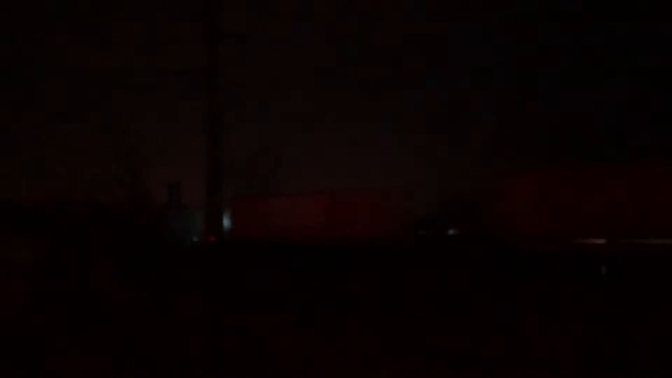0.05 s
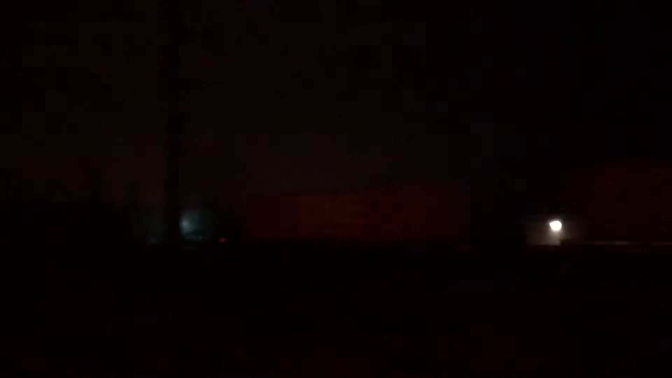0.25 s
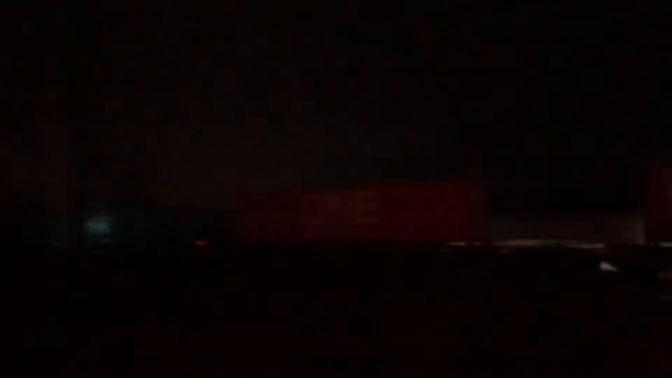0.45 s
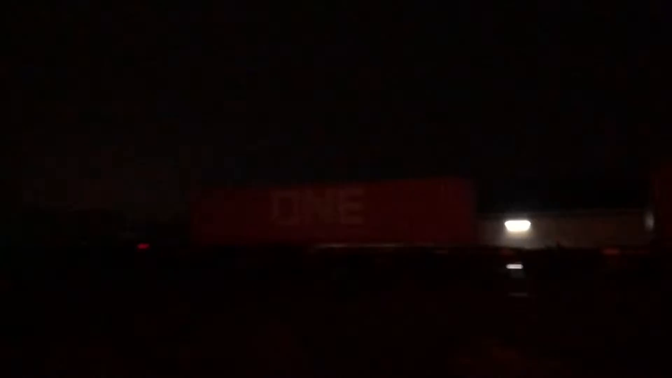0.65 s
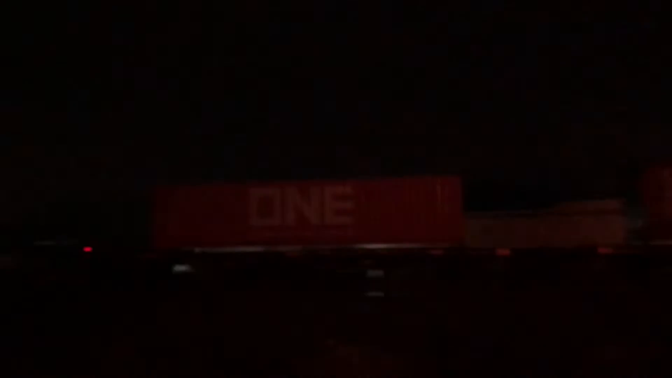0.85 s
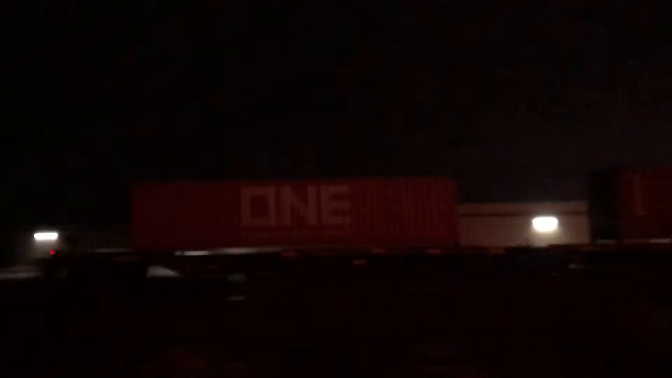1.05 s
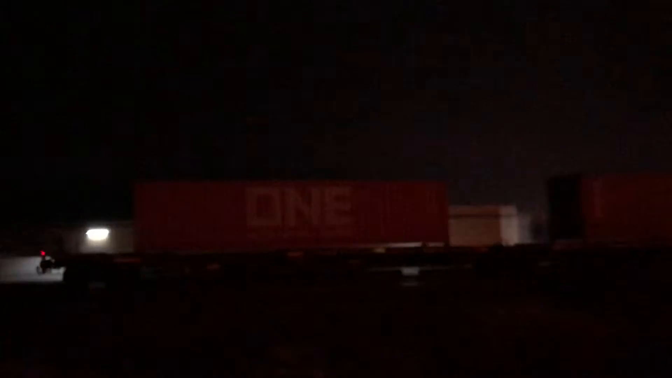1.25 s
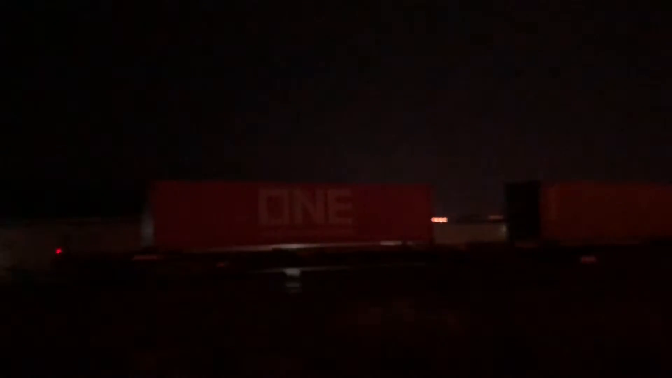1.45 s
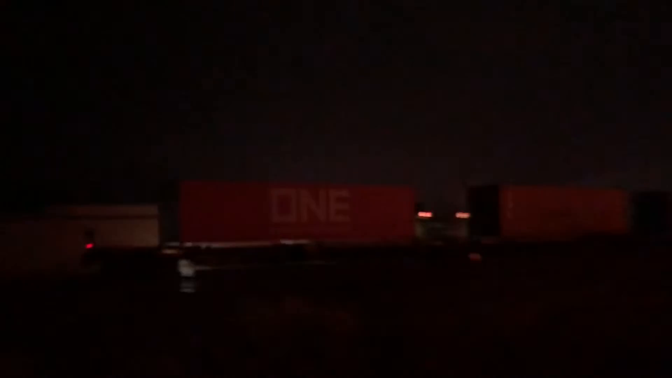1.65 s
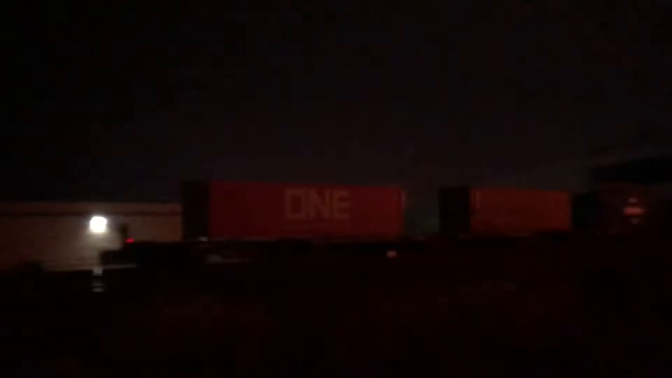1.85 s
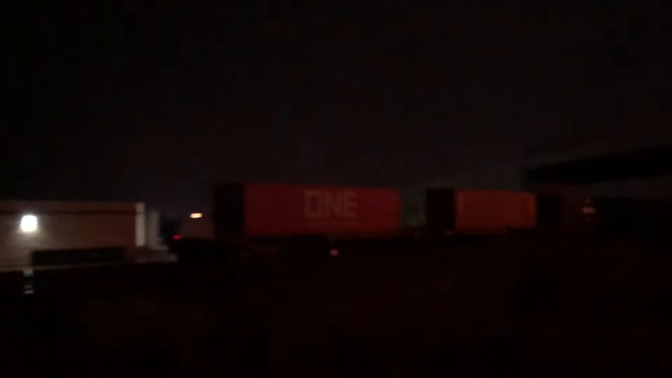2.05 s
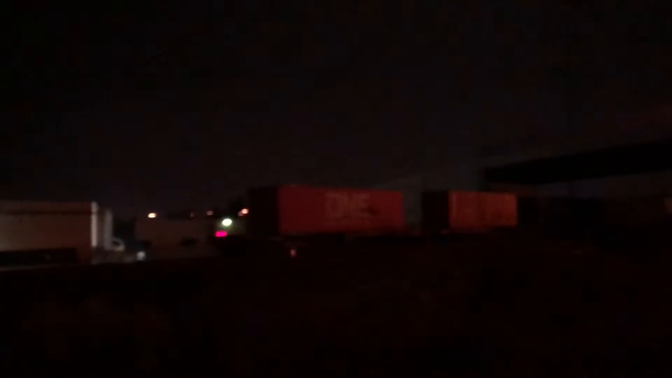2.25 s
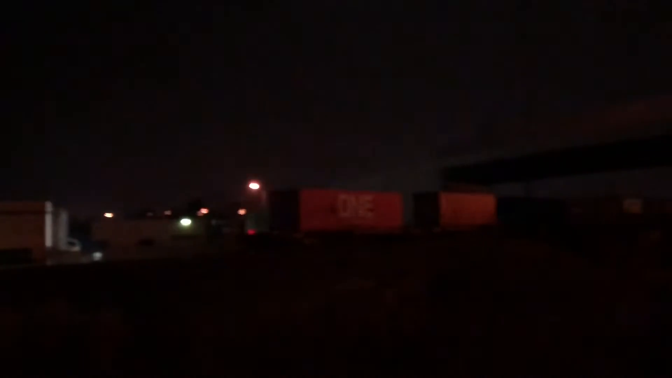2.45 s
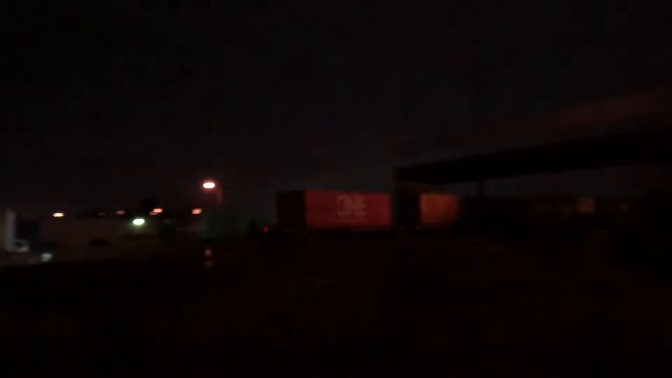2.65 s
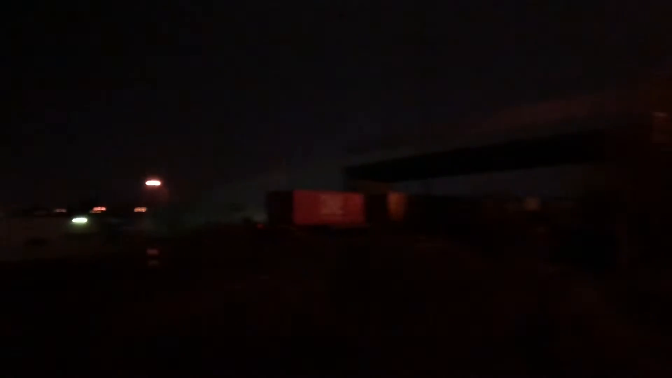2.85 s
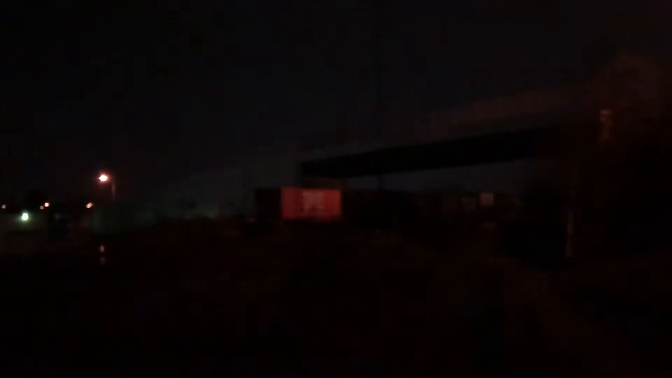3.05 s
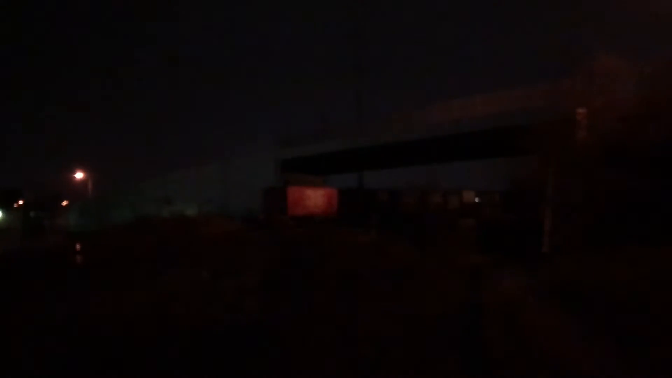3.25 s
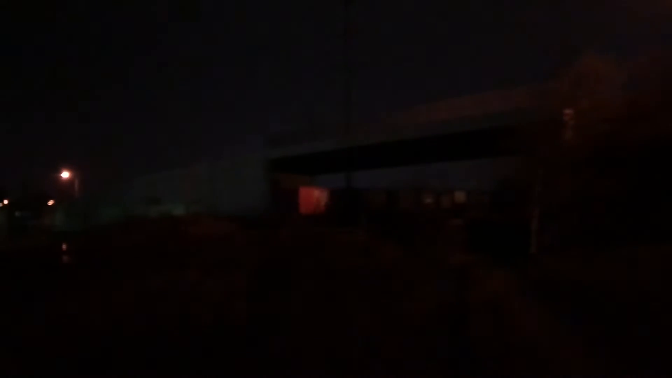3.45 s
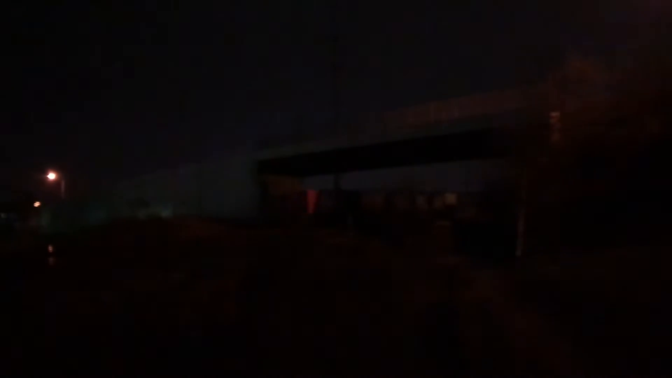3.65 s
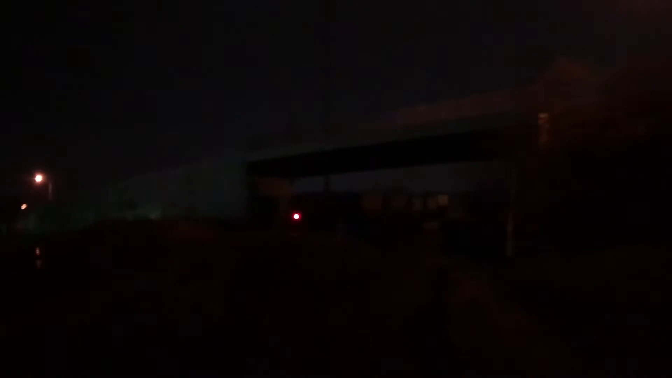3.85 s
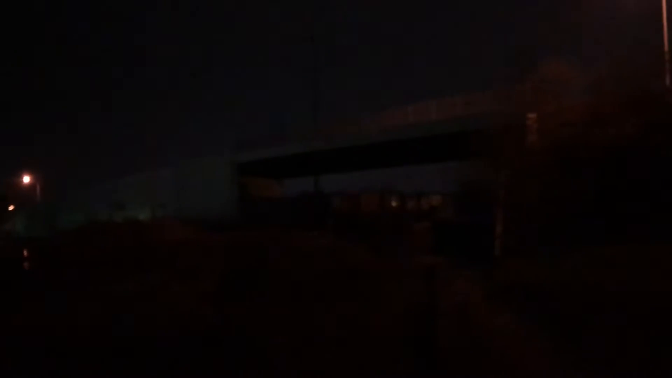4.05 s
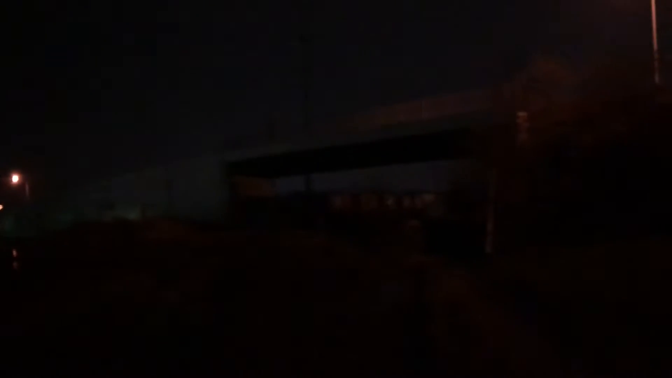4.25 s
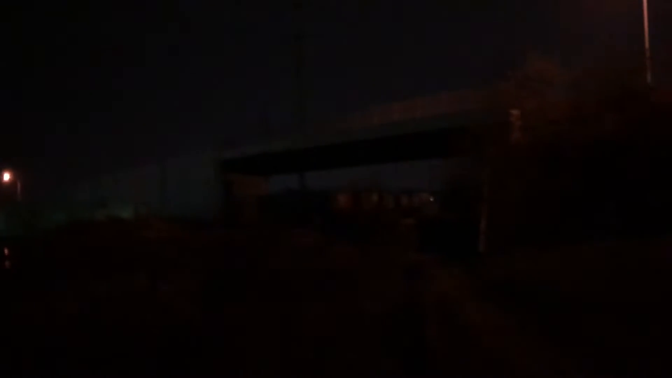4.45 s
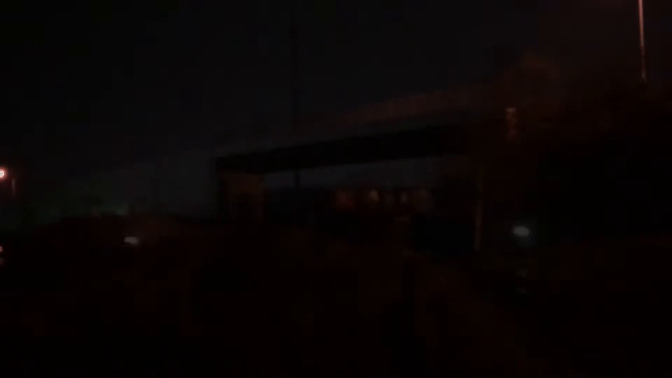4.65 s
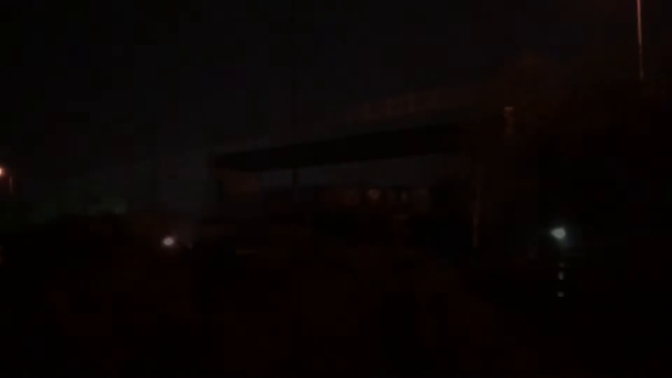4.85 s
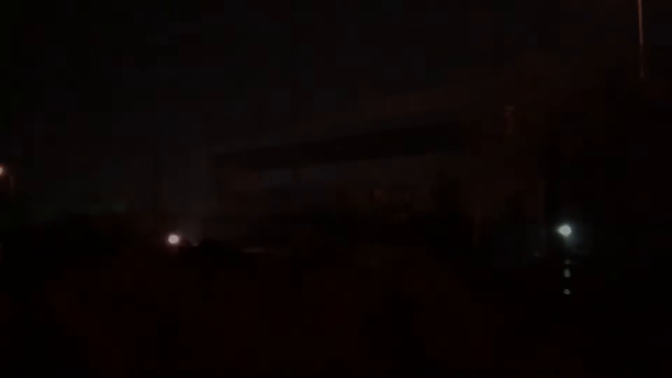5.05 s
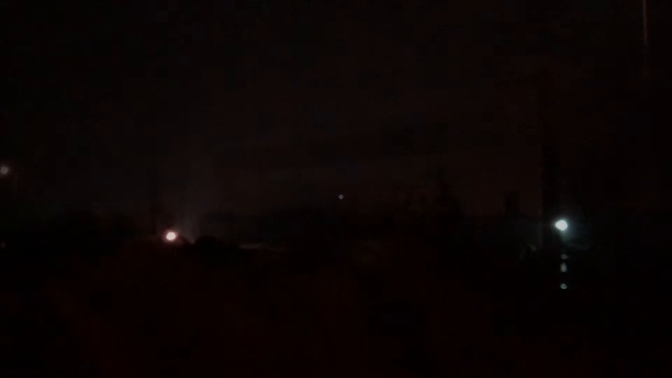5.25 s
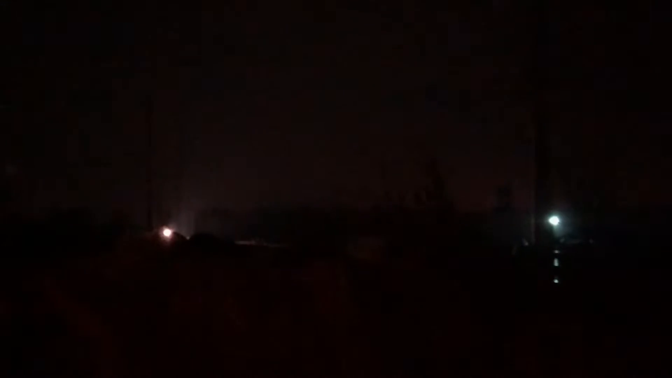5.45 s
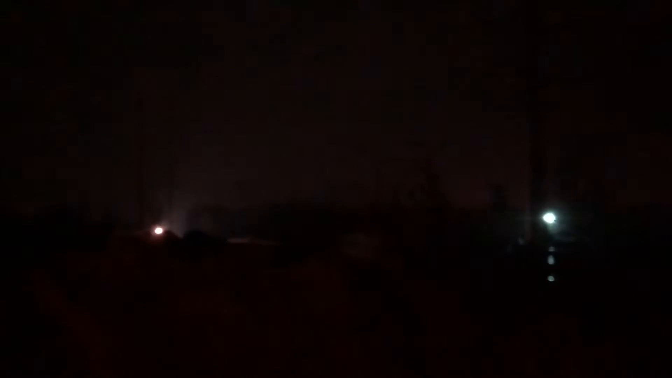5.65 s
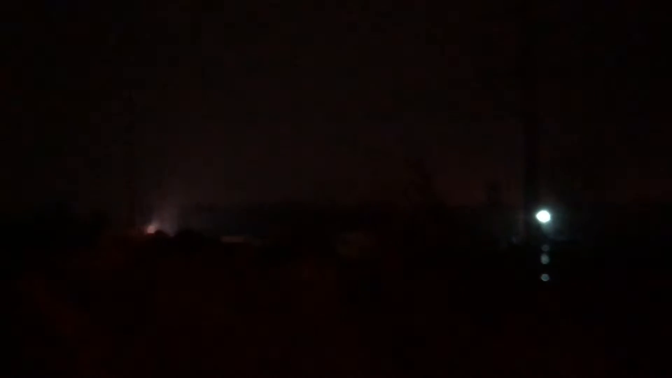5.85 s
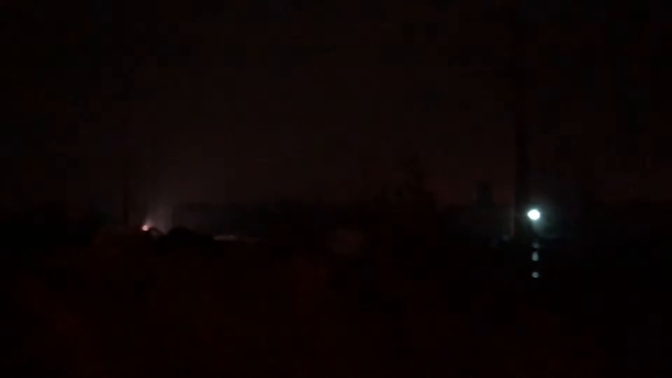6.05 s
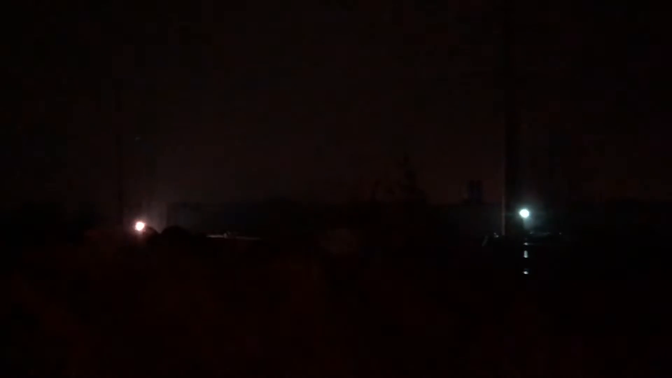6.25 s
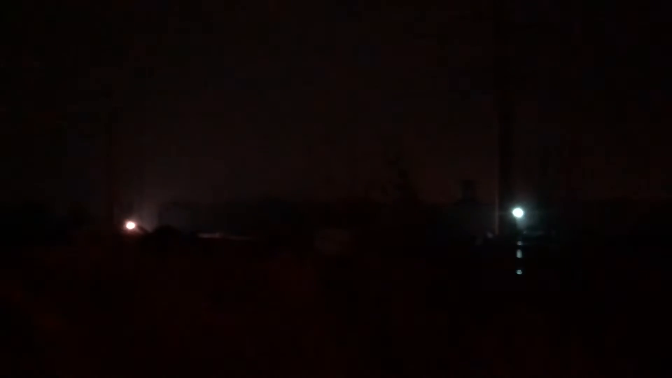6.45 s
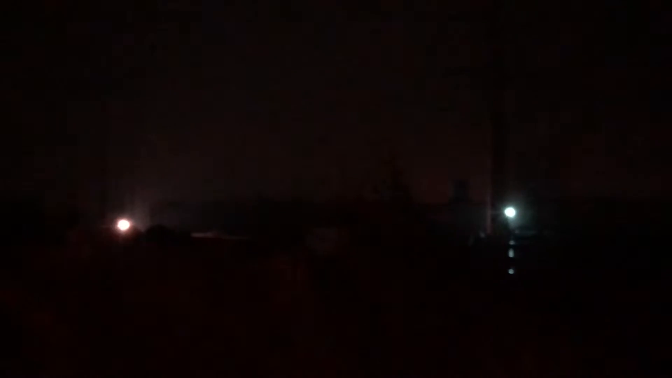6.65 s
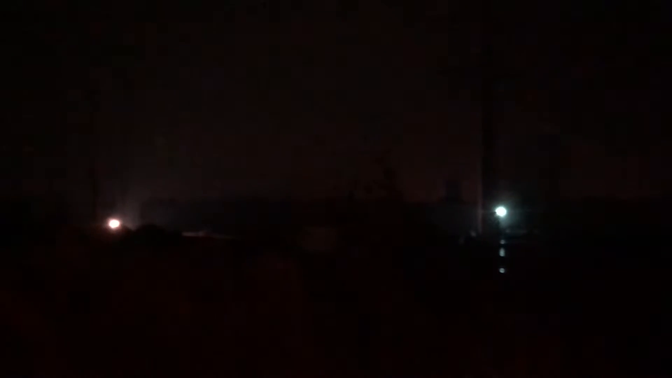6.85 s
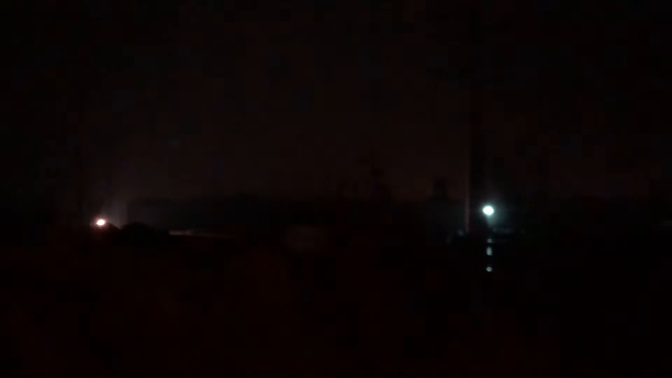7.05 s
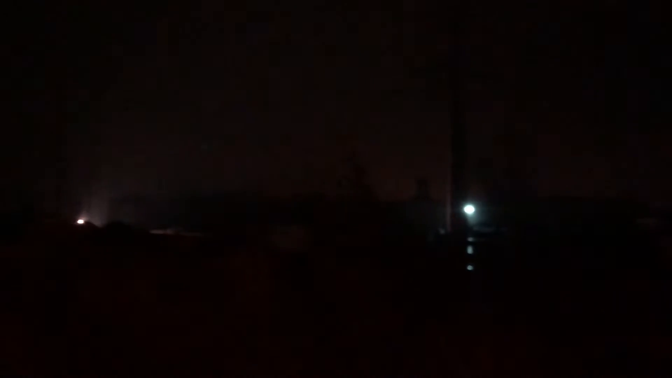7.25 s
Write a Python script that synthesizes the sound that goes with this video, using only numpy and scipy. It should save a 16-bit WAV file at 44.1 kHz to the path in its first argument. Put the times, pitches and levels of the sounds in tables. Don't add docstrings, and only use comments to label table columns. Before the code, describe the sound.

Loud steel wheel clatter and jingling rush past and recede with thin squeals, giving way to a faint, steady far-off diesel engine throb.

```python
import sys
import numpy as np
from scipy import signal
from scipy.io import wavfile
from scipy.ndimage import uniform_filter1d

SR = 44100
rng = np.random.default_rng(int(sys.argv[2]) if len(sys.argv) > 2 else 0)


def to_wav(sig):
    pcm = np.clip(np.atleast_2d(sig), -1, 1) * 32767
    pcm = np.round(pcm).astype(np.int16)
    wavfile.write(sys.argv[1], SR, pcm.T)


def volts_from_decibels(level):
    exponent = np.asarray(level, float) / 20
    return 10 ** exponent


N = 322371
TIME_S = np.arange(N) / SR

# frequency_hz, density_db (per Hz)
HISS_COLOUR = [(1530, -30), (2600, -1), (3310, -9), (4640, -8), (5040, -8.5), (13500, -17), (15100, -13.5),
               (15700, -19)]
HISS_DB = -78.5
# start_s, level_db, pitch_hz
BODY_SNAP = (5.0333, -45, 12500)
# first_s, period_s, pair_gap_s, first_db, last_db
LENS_TICKS = (7.113, .0333, .0129, -63, -50)

# multiple_of_cycle, level_db (rms)
EXHAUST_ORDERS = [(3, -71), (4, -97), (5, -72), (6, -53), (7, -70), (8, -75), (9, -53), (10, -62),
                  (11, -54.5), (12, -53), (13, -58), (14, -60), (15, -58), (16, -67.5), (17, -71),
                  (18, -82), (19, -61), (20, -71), (21, -57.5), (22, -77), (23, -72), (24, -83),
                  (25, -63.5), (26, -77.5), (27, -69), (28, -66), (29, -81), (30, -72.5), (31, -87),
                  (32, -86)]
CYCLE_HZ, FIRST_FIRING = 8.939, 0.104
# frequency_hz, density_db (per Hz)
FAR_COLOUR = [(15, -51), (25, -19), (38, -16), (92, -11), (146, -6), (157, -29), (192, -2), (383, -30),
              (471, -25), (711, -31.5), (874, -25.5), (1620, -31.5), (6000, -64), (7800, -94),
              (13200, -120)]
FAR_DB = -51
# centre_hz, width_hz, gain_db
FAR_PEAKS = [(680, 120, 3.5), (1590, 600, 0.5), (855, 8.6, 2)]
EXHAUST_DB, ROAR_DB, RUSH_DB, RUSH_DB_PER_S = 0.4, 2, 1, 3
FAR_FROM_S, FAR_FULL_S, FAR_BEND = 4.66, 5.37, 1.4
# start_s, first_hz, last_hz, width_hz, level_db (rms)
FAR_TONES = [
    (4.85, 655, 655, 50, -65),
    (4.9, 703, 703, 16, -69),
    (4.9, 476.4, 478.6, 2.4, -76),
    (4.9, 359.5, 359.7, 3.3, -79.5),
    (4.9, 297, 297, 16.4, -70.5),
    (5.95, 1640, 1660, 230, -64),
]
FAR_TONES_END_S = 7.8

SIDE_M, SPEED_M_S, ABEAM_S = 14.9, 11.12, 0.05
FADE_FROM_S, FADE_DB_PER_S = 4.807, 29.5
FADE_CLOSE_S, FADE_TO_S = 5.31, 5.5
# time_s, level_db
ROUGHNESS = [(0.0, -1), (0.12, 2), (0.24, 1), (0.38, 3), (0.49, -1), (0.72, 1.3), (0.84, 2.5), (0.95, 1),
             (1.16, 0.6), (1.26, -3.5), (1.42, 1), (1.85, 0), (2.3, 0.16), (2.95, 0.4), (3.4, 0.6),
             (3.7, -1), (4.2, 0.4), (4.75, 1.1)]
# frequency_hz, density_db (per Hz)
ROLL_COLOUR = [(15, -36.5), (25, -8.5), (44, -3), (92, 0), (293, -3), (394, -6), (607, -3), (1440, -9),
               (2160, -15.5), (2480, -19.5), (2910, -18), (3160, -18.5), (4870, -20.5), (14800, -54.5),
               (16000, -45)]
# centre_hz, width_hz, gain_db
ROLL_PEAKS = [(95.2, 36, 1), (280, 41, 0.5), (602, 250, -0.5), (1510, 60, 0), (2515, 90, 5.5),
              (3200, 150, 2.5), (4100, 100, 1.5), (2206, 190, -5.5), (406, 74, -2.5)]
# frequency_hz, abeam_db, ground_and_air_loss_db_per_m
ROLL_WAY = [(65, -28, 0.21), (200, -31.5, 0.03), (650, -30.5, 0.064), (1100, -31.5, -0.0267),
            (3600, -32, 0.06), (5910, -30, 0.2), (9000, -24, .6), (13020, -22, 0.4)]
# start_s, end_s, first_hz, last_hz, level_db (rms)
SQUEALS = [(.4, 0.62, 3470, 3460, -65), (0.52, 0.66, 2710, 2700, -38.5), (0.749, 1.5, 2700, 2550, -43.5),
           (2.2, 3.34, 3136, 3010, -55), (.93, 1.15, 4160, 4140, -43), (1.38, 2.104, 2525, 2470, -44),
           (1.45, 2.1, 3180, 3210, -49), (1.605, 1.762, 3550, 3600, -50), (1.8, 2.091, 3530, 3470, -51),
           (1.82, 2.089, 3840, 3870, -53), (1.1, 1.36, 8650, 9612, -57.5), (0.326, 0.33, 9200, 8600, -43),
           (.58, .64, 13600, 13400, -58), (2.85, 3.598, 1506, 1500, -44), (2.902, 3.5, 2440, 2450, -61),
           (4.721, 4.923, 1440, 1455, -42.5)]
# pitch_hz, width_hz
SQUEAL_WIDTHS = [(1450, 55), (2550, 80), (3300, 19), (9000, 49), (13500, 100)]
# start_s, pitch_hz, level_db, t60_s
PINGS = [(.040, 318, -11, .3), (.042, 590, -10, .16), (.677, 312, -9, .16), (.682, 520, -11, .3),
         (.752, 332, -10, .2), (.10, 125, -10, .4), (.135, 150, -9, .4), (.178, 118, -8, .3),
         (.195, 5400, -29, .15), (.209, 3535, -19, .3), (.305, 95, -15, .35), (.69, 90, -10, .5),
         (.70, 3740, -27, .1), (.765, 155, -12, .3), (.785, 100, -11, .5), (.84, 150, -12, .3),
         (.85, 690, -15, .2), (.95, 95, -16, .4), (.045, 10700, -34, .1), (.20, 810, -17, .3),
         (.77, 1340, -19, .15), (.265, 830, -19, .4), (.358, 120, -14, .2)]
# start_s, level_db (rms at the start), lowest_hz, t60_s
KNOCKS = [(0.047, -15, 200, 0.19), (0.117, -12.5, 170, 0.061), (0.147, -15, 170, 0.11),
          (0.206, -18, 160, 0.048), (.688, -12, 185, 0.08), (0.764, -11.5, 210, 0.07), (.785, -17, 400, .1),
          (.852, -6, 160, 0.043), (1.17, -30.5, 190, 0.042), (1.44, -38, 5000, .08),
          (1.505, -38, 8000, 0.065), (1.511, -17.5, 90, 0.072), (4.762, -30.5, 250, .14)]
KNOCK_SPAN = 9
# start_s, peak_db, thud_db, rattle_db (the last two relative to the peak)
AXLES = [(0.047, -0.5, -12, -12), (0.089, -18.5, -2.5, -7.5), (0.123, -2.5, -4, -10.5),
         (0.203, -4, -3.5, -13.5), (0.682, 1.5, -11.5, -14.5), (0.755, 1.5, -19.5, -17.5),
         (0.784, -19, -14.5, 2.5), (0.845, -10, -7.5, -12), (0.999, -21, -5, -10), (1.168, -13, -21, -25),
         (1.238, -13, -25, -15), (1.437, -15, -19, -10), (1.509, -22, -27, -15), (1.74, -25.5, -15, -4.5),
         (1.96, -32, -15, -3), (2.449, -22, -9, -18), (3.239, -17, -17, -19.5), (4.34, -36.5, -12, -5),
         (4.664, -31, -8, -20), (4.759, -30, -19, -10)]
# frequency_hz, density_db (per Hz)
BLOW_COLOUR = [(15, -52.5), (25, -17), (89, 1), (153, 3), (212, -6), (326, -11.5), (427, -14.5), (516, -12),
               (659, -8.5), (988, -20.5), (1480, -23), (2280, -25.5), (5430, -27.5), (10400, -41.5),
               (16000, -53)]
# frequency_hz,
# rise_s, t60_s, lead_s
BLOW_SHAPE = [(100, 0.0068, 0.21, .012), (397, 0.0075, 0.17, 0.011), (1200, .008, 0.14, .01),
              (4000, 0.013, 0.13, 0.027), (12000, 0.00594, 0.32, 0.014)]
# centre_hz, width_hz, gain_db
STEEL_PEAKS = [(826, 22, 4), (1170, 82, 2), (1395, 236, 8.5), (1932, 60, 6), (2640, 91, 6.5),
               (3280, 50, 5.5), (3870, 58, 8), (4240, 48, 5), (4610, 62, -2), (5250, 110, 3.5),
               (5400, 50, 5.5), (5800, 62, 4), (6190, 60, 6.5)]
ECHO_DB, ECHO_T60_S = -9, 1.204
TOP_DB, TOP_AIR_DB_PER_M = -9.5, 0.6


def rms_one(x):
    return x / np.sqrt(np.mean(x ** 2) + 1e-20)


def at_hz(points, hz, axis=1):
    points = np.array(points)
    return np.interp(np.log(hz), np.log(points[:, 0]), points[:, axis])


def fade(from_s, to_s, bend):
    return np.clip((TIME_S - from_s) / (to_s - from_s), 0, 1) ** bend


def drift(rate_hz):
    r = np.exp(-2 * np.pi * rate_hz * 40 / SR)
    white = rng.standard_normal(N // 40 + 2002)
    slow = signal.lfilter([1], [1, -2 * r, r * r], white)[2000:]
    return np.interp(np.arange(N) / 40, np.arange(len(slow)), rms_one(slow))


def ring(clicks, hz, t60):
    r, w = volts_from_decibels(-60 / (t60 * SR)), 2 * np.pi * hz / SR
    return signal.lfilter([0, np.sin(w)], [1, -2 * r * np.cos(w), r * r], clicks + 1e-18)


def fall(clicks, t60):
    return signal.lfilter([1], [1, -volts_from_decibels(-60 / (t60 * SR))], clicks + 1e-18)


def resonate(x, peaks):
    for hz, width_hz, db in peaks:
        r = np.exp(-np.pi * width_hz / SR)
        poles = [1, -2 * r * np.cos(2 * np.pi * hz / SR), r * r]
        top = signal.lfilter([(1 - r * r) / 2, 0, (r * r - 1) / 2], poles, x)
        x = x + (volts_from_decibels(db) - 1) * top
    return x


def noise_bands(low_hz=0, high_hz=20000):
    edges = 22 * 2 ** np.arange(0, 9.7, 1 / 4)
    white = rng.standard_normal((2, N + SR // 4))
    for k, (low, high) in enumerate(zip(edges, edges[1:])):
        if low_hz < low < high_hz:
            bandpass = signal.butter(2, [low, high], "band", fs=SR, output="sos")
            band = signal.sosfilt(bandpass, white[k % 2])
            yield np.sqrt(low * high), band[-N:]


def wandering_tones(rows, steady):
    out = np.zeros(N + SR)
    for start, end, first_hz, last_hz, width_hz, db in rows:
        constant = steady * np.exp(2j * drift(width_hz / 8))
        wander = drift(width_hz) + 1j * drift(width_hz) + constant
        i = np.arange(int(start * SR), int(end * SR))
        phase = 2 * np.pi * np.cumsum(np.linspace(first_hz, last_hz, len(i))) / SR
        tone = np.real(wander[i % N] * np.exp(1j * phase))
        out[i] += volts_from_decibels(db) * signal.windows.tukey(len(i), 0.45) * tone
    return out[:N]


def night_hiss():
    hiss = sum(volts_from_decibels(at_hz(HISS_COLOUR, hz)) * band for hz, band in noise_bands(low_hz=2700))
    return volts_from_decibels(HISS_DB) * resonate(rms_one(hiss), [(15050, 120, 5.6)])


def camera():
    snap, ticks = np.zeros(N), np.zeros(N)
    snap_s, snap_db, snap_hz = BODY_SNAP
    snap[round(snap_s * SR)] = volts_from_decibels(snap_db)
    first_s, period_s, gap_s, first_db, last_db = LENS_TICKS
    at_s = first_s + period_s * np.arange(6)
    for times in (at_s, at_s + gap_s):
        ticks[(times * SR).astype(int)] = volts_from_decibels(np.linspace(first_db, last_db, 6))
    highpass = signal.butter(4, 10000, "high", fs=SR, output="sos")
    return ring(snap, snap_hz, 0.003) + signal.sosfilt(highpass, ticks)


def exhaust():
    phase = 2 * np.pi * (CYCLE_HZ * TIME_S - FIRST_FIRING) + 0.012 * drift(0.52)
    uneven_leads = rng.normal(1.7, 0.4, len(EXHAUST_ORDERS))
    out = 0
    for (k, db), lead in zip(EXHAUST_ORDERS, uneven_leads):
        k = round(k)
        silencer_lag = 1.7 * (6 / max(k, 6)) ** 6
        offset = lead if k % 3 else -silencer_lag
        height = np.sqrt(2) * volts_from_decibels(db + 1.64 * drift(4.7))
        out = out + height * np.sin(k * phase + 0.23 * drift(4) + offset)
    return volts_from_decibels(EXHAUST_DB) * out


def engine_roar():
    rush_db = RUSH_DB + RUSH_DB_PER_S * (TIME_S - FAR_FULL_S)
    rush_share = [(900, 0), (1650, 1), (3000, 0.4)]
    under_exhaust = [(45, 0), (60, -10), (110, -9), (240, -8), (330, 2.5)]
    roar = 0
    for hz, band in noise_bands(high_hz=7000):
        level_db = ROAR_DB + at_hz(rush_share, hz) * (rush_db - ROAR_DB)
        colour_db = at_hz(FAR_COLOUR, hz) + at_hz(under_exhaust, hz)
        roar = roar + volts_from_decibels(colour_db + level_db + 0.84 * drift(4.3)) * band
    return volts_from_decibels(FAR_DB + 26) * resonate(roar, FAR_PEAKS)


def locomotive():
    return fade(FAR_FROM_S, FAR_FULL_S, FAR_BEND) * (exhaust() + engine_roar())


def far_fans():
    rows = [(start, FAR_TONES_END_S, *rest) for start, *rest in FAR_TONES]
    return wandering_tones(rows, steady=0.77)


def distance(s):
    return np.hypot(SIDE_M, SPEED_M_S * (np.asarray(s) - ABEAM_S))


def rolling():
    rough_s, rough_db = np.transpose(ROUGHNESS)
    roughness = volts_from_decibels(np.interp(TIME_S, rough_s, rough_db))
    away_m = distance(TIME_S)
    together, out = drift(14), 0
    for hz, band in noise_bands():
        way_db = at_hz(ROLL_WAY, hz) - at_hz(ROLL_WAY, hz, axis=2) * (away_m - SIDE_M)
        flicker_db = 0.9 * together + 0.62 * drift(9.9)
        out = out + volts_from_decibels(25 + at_hz(ROLL_COLOUR, hz) + way_db + flicker_db) * band
    return resonate(roughness * SIDE_M / away_m * out, ROLL_PEAKS)


def singing_wheels():
    rows = [(start, end, first_hz, last_hz, at_hz(SQUEAL_WIDTHS, first_hz), db)
            for start, end, first_hz, last_hz, db in SQUEALS]
    return volts_from_decibels(-0.5) * wandering_tones(rows, steady=0.9)


def pings():
    out, t = np.zeros(N), np.arange(SR) / SR
    for s, hz, db, t60 in PINGS:
        envelope = volts_from_decibels(db - 60 * t / t60) * (1 - np.exp(-t / 0.0062))
        tone = envelope * np.sin(2 * np.pi * hz * t + rng.uniform(0, 2 * np.pi))
        out[int(s * SR):int(s * SR) + SR] += tone
    return out


def knocks():
    out, t = np.zeros(N), np.arange(SR // 4) / SR
    for s, db, low_hz, t60 in KNOCKS:
        high_hz = min(KNOCK_SPAN * low_hz, 15000)
        bandpass = signal.butter(3, [low_hz, high_hz], "band", fs=SR, output="sos")
        noise = rms_one(signal.sosfilt(bandpass, rng.standard_normal(len(t))))
        burst = noise * (1 - np.exp(-t / 0.0028))
        out[int(s * SR):int(s * SR) + len(t)] += volts_from_decibels(db - 60 * t / t60) * burst
    return out


def axle_clicks(db):
    clicks = np.zeros(N)
    clicks[(np.array(AXLES)[:, 0] * SR).astype(int)] = volts_from_decibels(db)
    return clicks


def clatter():
    s, peak_db, thud_db, rattle_db = np.transpose(AXLES)
    top_db = rattle_db + TOP_DB - TOP_AIR_DB_PER_M * (distance(s) - SIDE_M)
    usual_gap = [(150, 5), (350, 0), (1200, 0), (2500, 15), (6000, 15), (9000, 26)]
    shake, out = volts_from_decibels(0.73 * drift(60)), 0
    for hz, band in noise_bands():
        own_db = []
        for low, mid, top in zip(thud_db, rattle_db, top_db):
            blow_colour = [(150, low), (350, 0), (1200, 0), (2500, mid), (6000, mid), (9000, top)]
            own_db.append(at_hz(blow_colour, hz))
        hits = axle_clicks(peak_db + own_db + at_hz(usual_gap, hz))
        hits = np.roll(hits, -int(at_hz(BLOW_SHAPE, hz, axis=3) * SR))
        dying = fall(hits, at_hz(BLOW_SHAPE, hz, axis=2)) + volts_from_decibels(ECHO_DB) * fall(hits, ECHO_T60_S)
        keep = np.exp(-1 / (at_hz(BLOW_SHAPE, hz) * SR))
        swell = signal.lfilter([(1 - keep) ** 2], [1, -2 * keep, keep * keep], dying)
        out = out + volts_from_decibels(at_hz(BLOW_COLOUR, hz) + 1.0 * drift(25)) * swell * band
    return volts_from_decibels(11) * shake * resonate(out, STEEL_PEAKS)


def jingle(shaken):
    out = 0
    for hz in np.geomspace(2200, 14500, 48) * rng.uniform(1.0, 1.03, 48):
        bandpass = signal.butter(2, [hz * 0.92, hz * 1.1], "band", fs=SR, output="sos")
        band = signal.sosfilt(bandpass, shaken)
        shaking = np.sqrt(uniform_filter1d(band ** 2, size=1300) + 1e-20)
        touches = (rng.random(N) < 13 / SR) * rng.uniform(0.3, 1, N)
        level_db = at_hz([(5000, 0.1), (9000, 5.5)], hz)
        t60 = at_hz([(5000, 0.12), (9000, 0.06)], hz)
        out = out + volts_from_decibels(level_db) * ring(touches * shaking, hz, t60)
    return volts_from_decibels(-1.0) * out


def train():
    shaken = rolling() + clatter()
    near = shaken + jingle(shaken) + knocks() + pings() + singing_wheels()
    weakening = volts_from_decibels(-FADE_DB_PER_S * np.maximum(TIME_S - FADE_FROM_S, 0))
    return fade(FADE_TO_S, FADE_CLOSE_S, 0.88) * weakening * near


def scene():
    mono = night_hiss() + camera() + locomotive() + far_fans() + train()
    return np.array([mono, mono])


def roll_off(x):
    return signal.sosfilt(signal.butter(12, 16390, fs=SR, output="sos"), x)


def record(dry):
    highpass = signal.butter(2, 42, "high", fs=SR, output="sos")
    lowpass = signal.ellip(12, 0.5, 70, 15720, fs=SR, output="sos")
    x = signal.sosfilt(highpass, dry)
    rounded = 1.1 * np.tanh(x / 1.1)
    mix = signal.sosfilt(lowpass, rounded)
    return roll_off(mix)


dry = scene()
out = record(dry)
to_wav(out)
```